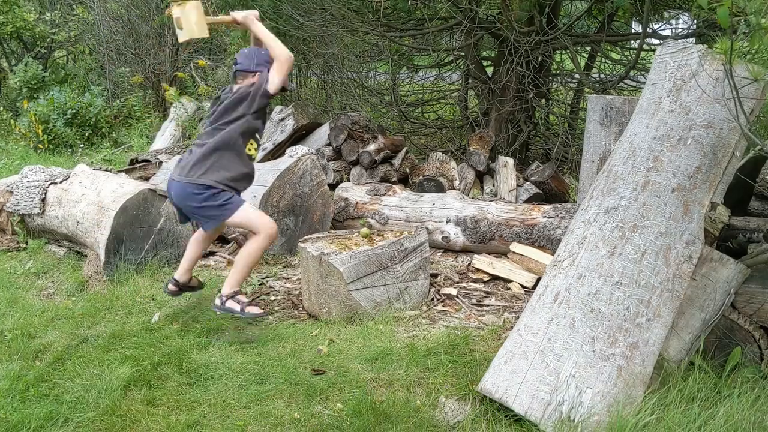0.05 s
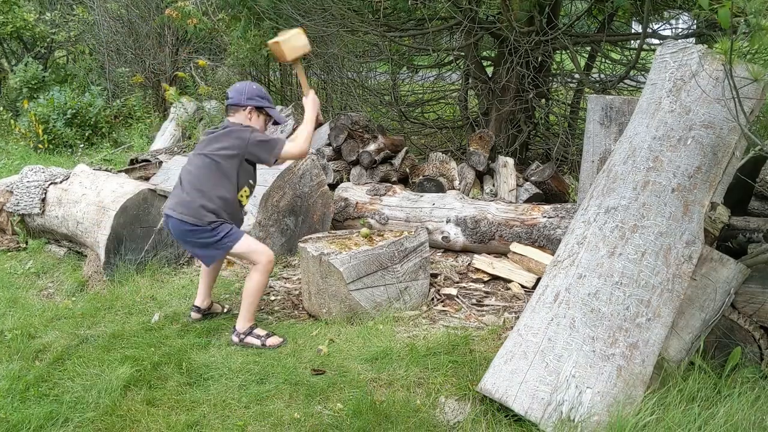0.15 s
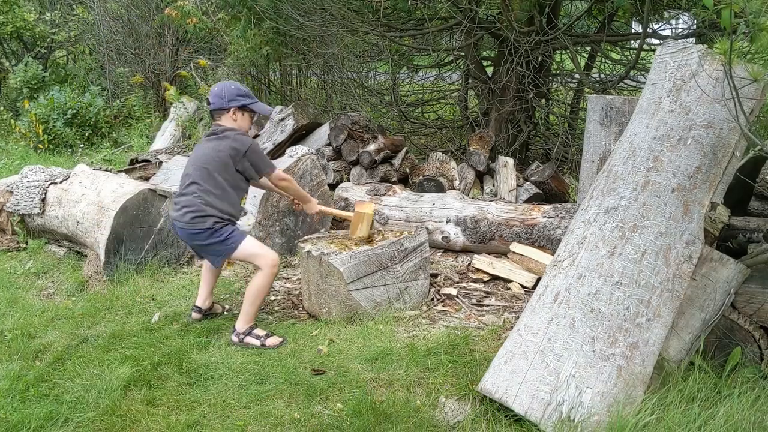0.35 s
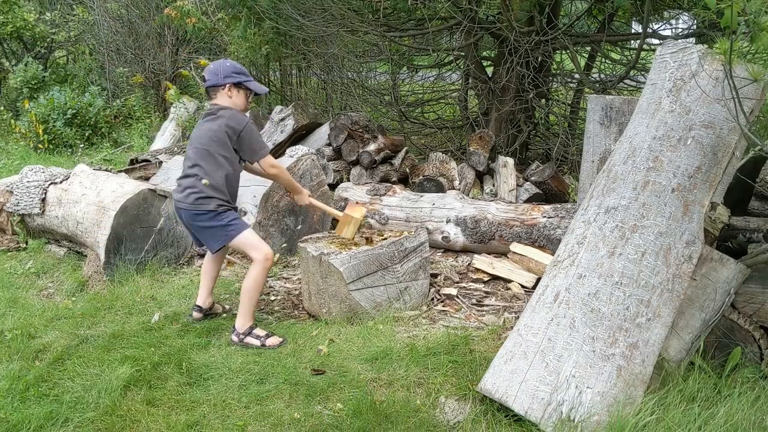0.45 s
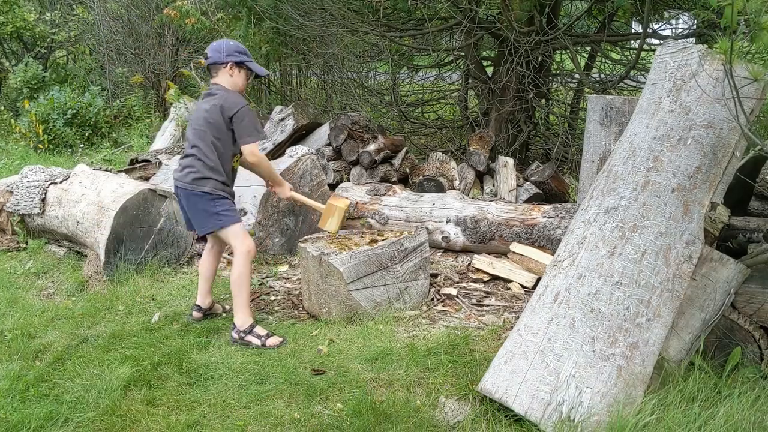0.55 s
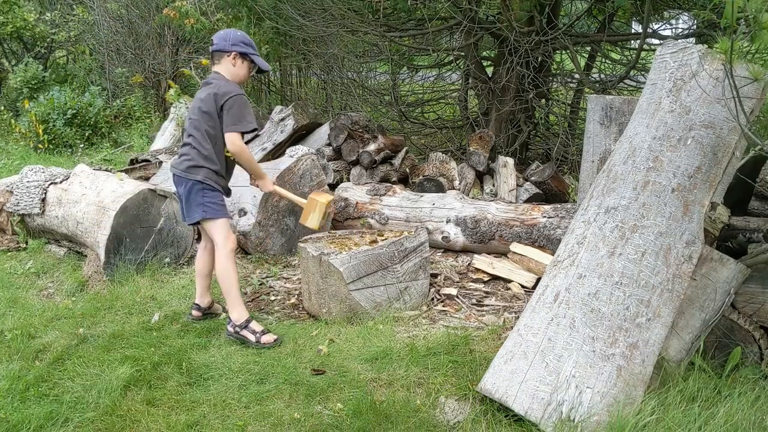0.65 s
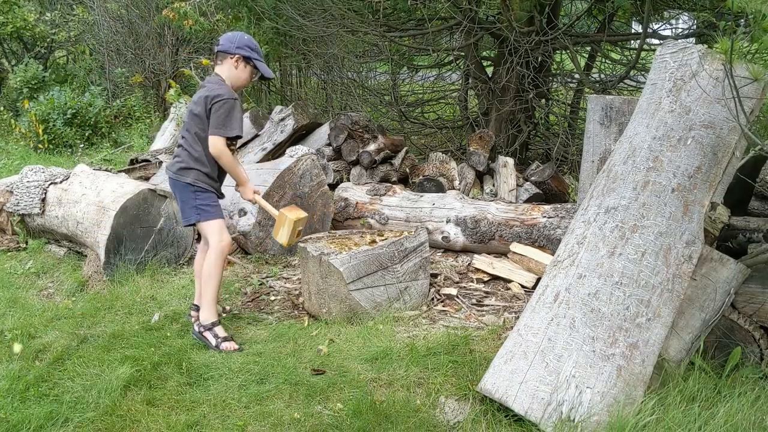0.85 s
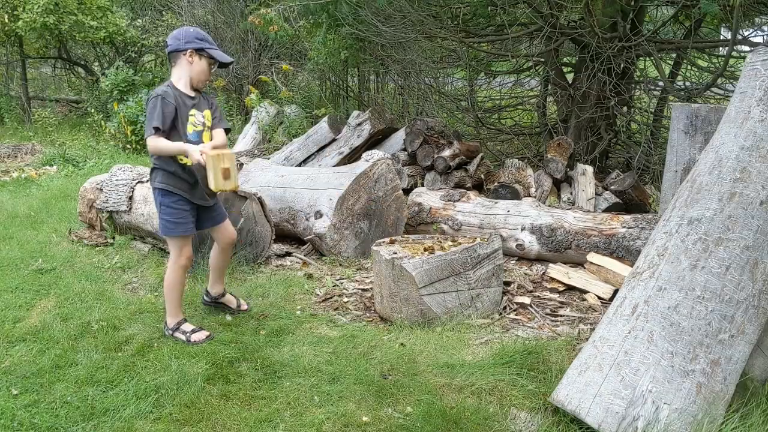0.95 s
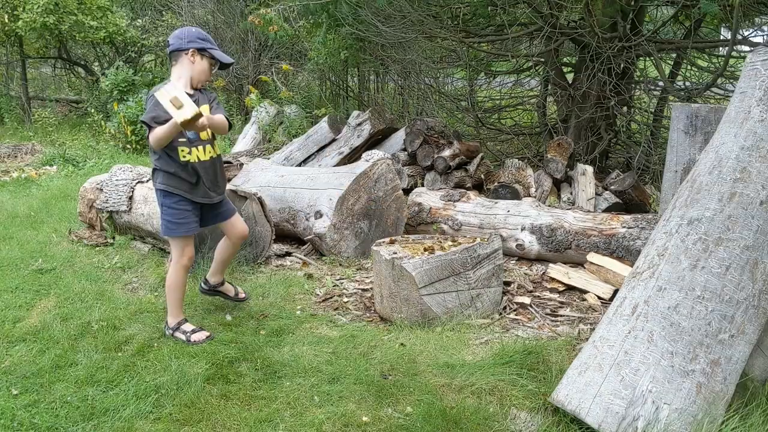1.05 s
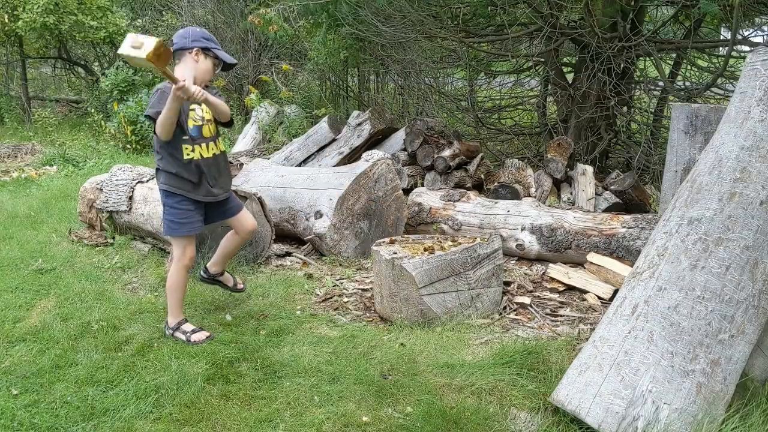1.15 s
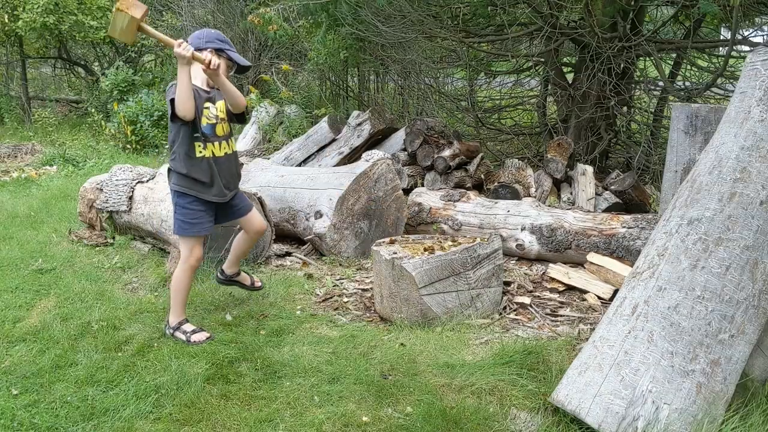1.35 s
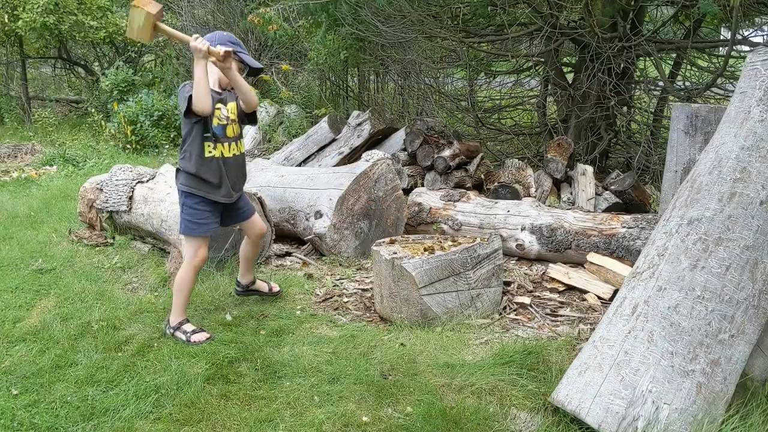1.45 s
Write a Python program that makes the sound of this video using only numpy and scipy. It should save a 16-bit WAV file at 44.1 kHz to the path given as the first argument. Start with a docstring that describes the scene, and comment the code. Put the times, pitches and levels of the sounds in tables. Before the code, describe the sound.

A wooden mallet lands on a log stump with a dull, crunching thud, followed at once by a sharp wooden knock. Garden trees scatter a short echo, while light wind buffets the microphone over faint hiss and distant chirps.

```python
"""A garden, with a woodpile close by and trees behind it. A wooden mallet comes down on a log stump:
a dull, crunching thud, then a sharp knock of wood on wood, each a few quick contacts that ring the wood.
The woodpile and the trees scatter the sound back. Light wind buffets the microphone, soft low bumps
surround the swing, a faint hiss swells and falls back, and a small bird chirps far away."""
import sys
import numpy as np
from scipy import signal
from scipy.fft import rfft, irfft, next_fast_len
from scipy.io import wavfile

SR = 44100
rng = np.random.default_rng(int(sys.argv[2]) if len(sys.argv) > 2 else 0)


def int16_out(signal):
    """Quantize to a 16-bit WAV file."""
    q = np.round(np.clip(np.atleast_2d(signal).T, -1, 1) * 32767)
    wavfile.write(sys.argv[1], SR, q.astype(np.int16))


N = 66150


def amp(db):
    """Decibels to gain."""
    return 10 ** (np.asarray(db) / 20)


def along(points, hz):
    """Read (Hz, value) points on a log frequency axis."""
    point_hz, values = np.transpose(points)
    return np.interp(np.log(hz + 1), np.log(point_hz + 1), values)


def since(start_s):
    """Seconds elapsed after a moment, zero before it."""
    return np.maximum(np.arange(N) / SR - start_s, 0)


def curve(points):
    """Join (seconds, value) points into one value per sample."""
    return np.interp(since(0), *np.transpose(points))


def burst(start_s, rise_s, t60_s):
    """An envelope that rises at start_s and dies away."""
    t = since(start_s)
    return (1 - np.exp(-t / rise_s)) * amp(-60 * t / t60_s)


def filtered(x, response):
    """Filter x by a complex response of frequency."""
    size = next_fast_len(N + SR // 2)
    return irfft(rfft(x, size) * response(np.fft.rfftfreq(size, 1 / SR)), size)[..., :N]


def noise(spectrum, alike):
    """Stereo noise of rms 1; alike is the left-right likeness, a number or (Hz, likeness) points."""
    def response(hz):
        likeness = along(alike, hz) if np.ndim(alike) else np.full_like(hz, alike)
        angle = np.arccos(np.clip(likeness, -1, 1)) / 2
        return amp(along(spectrum, hz)) * np.array([np.cos(angle), np.sin(angle)])
    mid, side = filtered(rng.standard_normal((2, N)), response)
    stereo = np.array([mid + side, mid - side])
    return stereo / np.sqrt(np.mean(stereo ** 2) + 1e-20)


def panned(x, left_db):
    """Make the left channel left_db louder than the right."""
    return x * amp(np.array([[left_db], [-left_db]]) / 2)


def hiss():
    """Faint outdoor hiss; a brighter rush grows over it and stops short."""
    # Each row: time in seconds, level of the hiss in dB.
    levels = [(0, -55), (.34, -52), (.55, -54), (.88, -53), (.98, -58), (1.15, -57), (1.5, -55)]
    # Spectra of the hiss and the rush. Each row: frequency in Hz, relative level in dB.
    hiss_spectrum = [(120, 2), (300, 7.5), (600, 7), (950, 3.5), (1300, -1.5), (2200, -5.5), (3100, 1.5),
                     (4900, 0), (5350, 5.5), (5900, 3), (6500, -8), (7100, -1), (7600, 3.5), (8200, 0),
                     (8700, -5), (9700, -4.5), (11000, -13), (11900, -6.5), (12700, -15), (15500, -12.5)]
    rush_spectrum = [(150, 9.5), (350, 11), (850, 6.5), (1300, 0.5), (2200, -3), (3100, 2), (4700, -1.5),
                     (5600, 7), (6700, -3), (7500, 6.5), (8800, -5.5), (9800, 4.5), (11000, -5.5),
                     (11900, 1.5), (12800, -10), (15500, -4.5)]
    # Each row: frequency in Hz, left-right likeness of the hiss from -1 to 1.
    likeness = [(60, 0.87), (240, -0.31), (950, 0.46), (3770, -0.31), (15000, 0.5)]
    start_s, full_s, end_s, release_s = .44, .89, .954, .002
    swell = np.clip(since(start_s) / (full_s - start_s), 0, 1) * np.exp(-since(end_s) / release_s)
    bed = amp(curve(levels)) * noise(hiss_spectrum, likeness)
    rush = amp(-53) * swell * noise(rush_spectrum, alike=.64)
    return panned(bed + rush, left_db=2.5)


def bird():
    """A small bird far off: three arched notes a call, the first lower and softer."""
    # Each row: middle of a call's first note in seconds, level in dB.
    calls = [(0.178, -59), (0.612, -60), (1.220, -59.5)]
    spacing_s, width_s, top_hz, arch_hz = .034, .0062, 4780, 89.5
    out = np.zeros(N)
    for call_s, db in calls:
        for note, (lower_hz, softer_db) in enumerate([(110, 1), (0, 0), (0, 0)]):
            offset = (since(0) - call_s - note * spacing_s) / width_s
            hz = top_hz - lower_hz - arch_hz * np.minimum(offset ** 2, 2)
            envelope = amp(db - softer_db) * np.exp(-offset ** 2 / 2)
            out += envelope * np.sin(2 * np.pi * np.cumsum(hz) / SR)
    return out


def wind():
    """Light gusts buffet the microphone with a low rumble."""
    # Each row: time in seconds, level in dB.
    gusts = [(0, -50), (.05, -48.5), (.075, -39.5), (.16, -46), (.19, -34.5), (.26, -35.5), (.32, -38),
             (.36, -55), (.40, -36.5), (.46, -51), (.56, -41.5), (.62, -45.5), (.68, -35.5), (.74, -46.5),
             (.92, -49), (.98, -50.5), (1.4, -53), (1.5, -50.5)]
    # Each row: frequency in Hz, relative level in dB.
    rumble_spectrum = [(15, -1.5), (38, 1), (60, -4.5), (90, -6.5), (130, -12.5), (200, -21.5), (320, -40),
                       (700, -47), (2000, -78)]
    rumble = noise(rumble_spectrum, alike=[(35, 1.0), (120, .5)])
    return panned(amp(curve(gusts)) * rumble, left_db=-.5)


def bumps():
    """Short, dull puffs of low noise around the swing."""
    # Each row: start in seconds, level in dB, bandwidth in Hz.
    puffs = [(0.063, -36.5, 196), (0.085, -43, 226), (0.135, -43.5, 190), (0.183, -43, 150),
             (0.308, -35.5, 280), (0.431, -40, 235)]
    out = np.zeros((2, N))
    for start_s, db, hz in puffs:
        low_noise = noise([(hz / 2, 0), (hz, -6), (10 * hz, -65)], alike=.54)
        out += amp(db) * burst(start_s, rise_s=.0019, t60_s=.14) * low_noise
    return out


def scatter(sound, colour, delay_s, rise_s, t60_s):
    """Many rough surfaces spread a sound's energy over time and return it as diffuse noise."""
    low_hz = 1000  # longer waves pass between the logs and trunks
    power = filtered(sound.mean(axis=0), lambda hz: 1 / (1 + (low_hz / (hz + 1)) ** 4)) ** 2
    spread = burst(delay_s, rise_s, t60_s) ** 2
    returned_power = signal.fftconvolve(power, spread / spread.sum())[:N]
    return np.sqrt(np.abs(returned_power)) * noise(colour, alike=.2)


def garden_returns(sound):
    """The near woodpile answers briefly, the trees behind it at length, with distinct far echoes."""
    # Spectra of the three returns. Each row: frequency in Hz, relative level in dB.
    woodpile_colour = [(200, -9), (600, -9), (1300, -3.5), (1680, 1.5), (2150, -3), (2700, -0.5), (3800, 0),
                       (4800, -8), (5900, -0.5), (6800, -7.5), (10000, -10.5), (15000, -16.5)]
    tree_colour = [(300, -21), (1200, -7), (1750, 0), (2450, -5.5), (3100, 1.5), (3700, -0.5), (4000, 5),
                   (4400, -16), (6000, -0.5), (8000, -11), (15000, -18)]
    echo_colour = [(300, -21), (1200, -7.5), (1750, 5.5), (2450, 1), (3200, 3.5), (4000, 0.5), (4800, -4),
                   (15000, -15)]
    # Each row: delay in seconds, gain in dB.
    far_echoes = [(.090, -31), (0.124, -30), (0.244, -35.5)]
    woodpile = amp(-15) * scatter(sound, woodpile_colour, delay_s=.011, rise_s=.012, t60_s=.099)
    trees = amp(-22) * scatter(sound, tree_colour, delay_s=.037, rise_s=.012, t60_s=1)
    echoes = sum(amp(db) * scatter(sound, echo_colour, delay_s, rise_s=.0022, t60_s=.0714)
                 for delay_s, db in far_echoes)
    return woodpile + trees + echoes


def blow(contacts, modes, grit_spectrum, grit_t60_s, low_hz):
    """Each contact rings the modes (a softer one only the low ones) and cracks in a burst of noise."""
    out = np.zeros((2, N))
    for start_s, push_db, bandwidth_hz, grit_db in contacts:
        t = since(start_s)
        ring = np.zeros((2, N))
        for hz, db, t60_s in modes:
            # each mode reaches the two microphones a little out of step
            phase = .12 * rng.standard_normal() * np.array([[1], [-1]])
            ring += (t > 0) * amp(db - 60 * t / t60_s) * np.sin(2 * np.pi * hz * t + phase)
        out += amp(push_db) * filtered(ring, lambda hz: 1 / (1 + 1j * hz / bandwidth_hz) ** 2)
        grit_envelope = amp(grit_db) * burst(start_s, rise_s=.000093, t60_s=grit_t60_s)
        out += grit_envelope * noise(grit_spectrum, alike=.27)
    # the wood radiates little below low_hz
    return signal.sosfilt(signal.butter(3, low_hz, "high", fs=SR, output="sos"), out)


def thud():
    """The mallet sinks into the stump and crushes the bark."""
    # Each row: start in seconds, push in dB, contact bandwidth in Hz, crunch in dB.
    contacts = [(.2292, -40.5, 823, -36), (.2317, -16.5, 914, -46), (.2334, -26.5, 1380, -22),
                (.2387, -31.5, 2200, -23.5), (.2436, -38.5, 700, -30)]
    # Each row: frequency in Hz, relative level in dB, seconds to fall 60 dB.
    stump_modes = [(207, -16.5, 0.036), (339, -11.5, 0.036), (428, -17.5, 0.059), (545, -11.5, .024),
                   (672, -6, .026), (936, -0.5, .048), (1265, -20, 0.027), (1610, -6, 0.039)]
    # Each row: frequency in Hz, relative level in dB.
    crunch_spectrum = [(200, 8), (1000, 7.5), (2000, -4), (4400, -6), (5500, 3), (6700, -11.5),
                       (7800, -4.5), (11800, -10), (15500, -16)]
    return panned(blow(contacts, stump_modes, crunch_spectrum, grit_t60_s=.012, low_hz=142), left_db=2)


def knock():
    """Wood on wood: a quick chatter of contacts rings the dry wood with a sharp crack."""
    # Each row: start in seconds, push in dB, contact bandwidth in Hz, crack in dB.
    contacts = [(.3613, -19.5, 2000, -21), (.3621, -11.5, 1640, -43), (.3640, -10, 5800, -18),
                (.3660, -26, 9000, -20), (.3687, -38.5, 9000, -17)]
    # Each row: frequency in Hz, relative level in dB, seconds to fall 60 dB.
    wood_modes = [(250.4, 3.5, 0.1), (544, -19, 0.037), (690, -12, 0.021), (1190, -23, .013),
                  (1324, -18, 0.024), (1502, -14, 0.038), (1703, 1.5, 0.014), (1909, -22, 0.07),
                  (2300, -5.5, .01), (2625, -27, 0.13), (2890, -0.5, 0.026), (3060, -16, 0.052),
                  (3300, 0, 0.014), (3790, -10.5, 0.044), (3950, -11, .043), (4440, -23, 0.058),
                  (5995, -39, 0.0508)]
    # Each row: frequency in Hz, relative level in dB.
    crack_spectrum = [(250, 5), (400, 0), (900, -9), (1500, 7.5), (2400, -2.5), (4000, 3.5), (4900, -5),
                      (6100, 5), (7000, -5), (8900, -11.5), (9700, -0.5), (11200, -9), (13500, -10),
                      (15200, -7.5)]
    return panned(blow(contacts, wood_modes, crack_spectrum, grit_t60_s=.027, low_hz=550), left_db=.9)


def scene():
    """Everything that reaches the microphone; the level dips briefly as the rush stops."""
    dip_s, dip_width_s, dip_db = .956, .0018, -20
    dip = amp(dip_db * np.exp(-((since(0) - dip_s) / dip_width_s) ** 2 / 2))
    mallet = thud() + knock()
    return dip * (mallet + garden_returns(mallet) + wind() + bumps() + hiss() + bird())


def record(dry):
    """The recorder rounds off the loudest peak and keeps nothing above its band limit."""
    ceiling, top_hz, edge_hz = .85, 15850, 300
    rounded = dry / (1 + np.abs(dry / ceiling) ** 6) ** (1 / 6)
    return filtered(rounded, lambda hz: np.clip((top_hz - hz) / edge_hz + .5, 0, 1))


dry = scene()
out = record(dry)
int16_out(out)
```